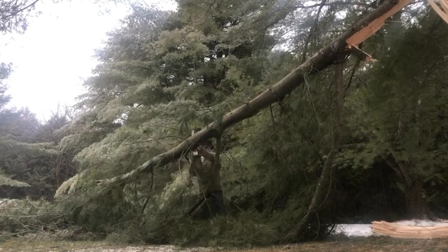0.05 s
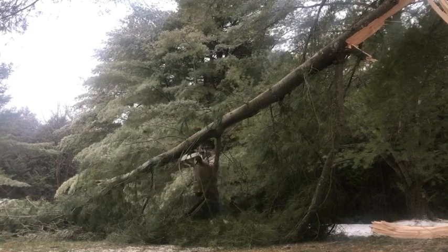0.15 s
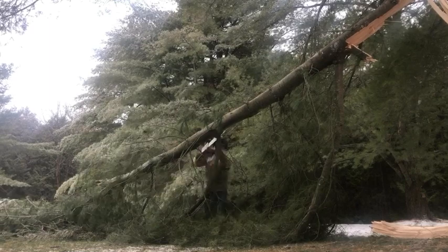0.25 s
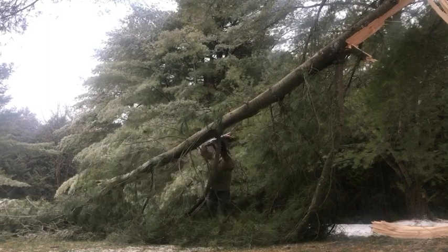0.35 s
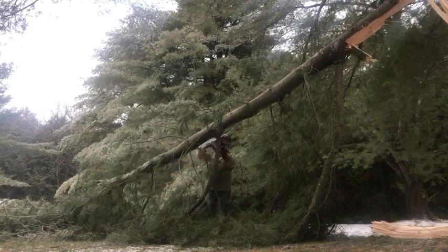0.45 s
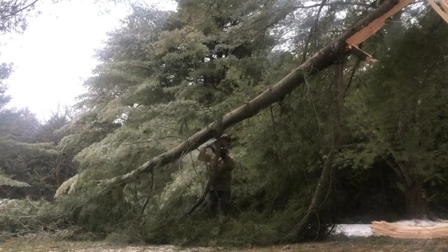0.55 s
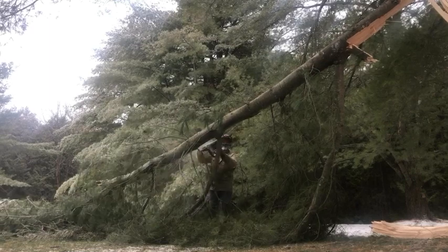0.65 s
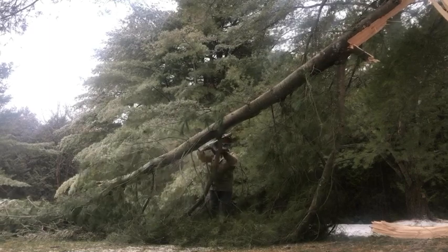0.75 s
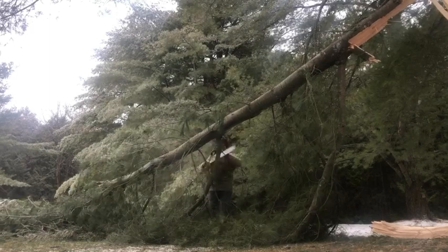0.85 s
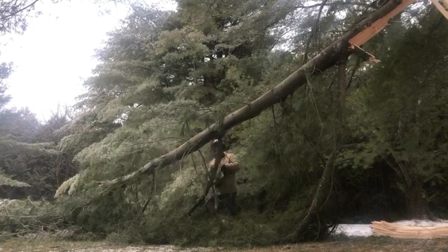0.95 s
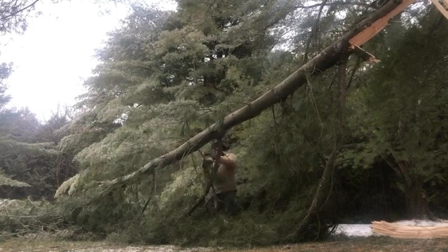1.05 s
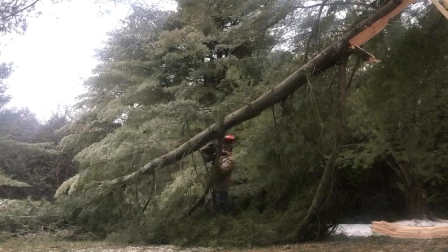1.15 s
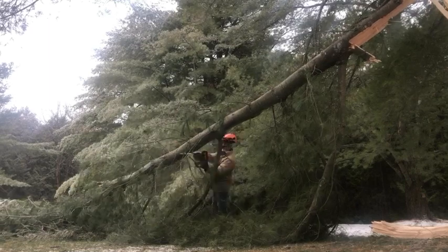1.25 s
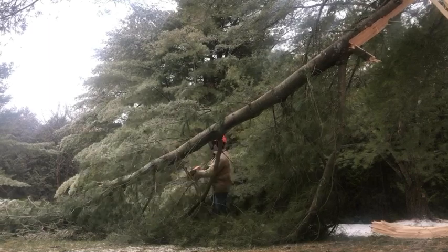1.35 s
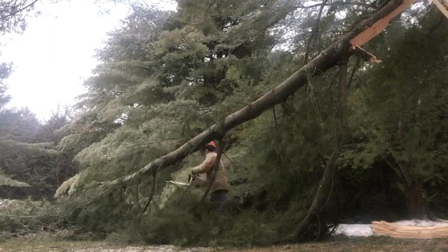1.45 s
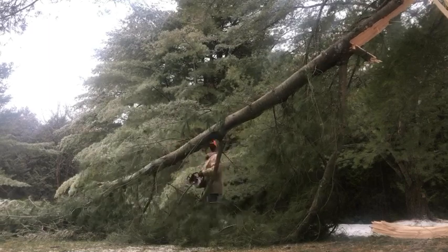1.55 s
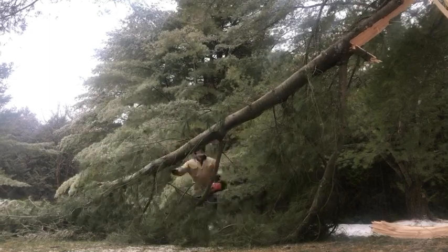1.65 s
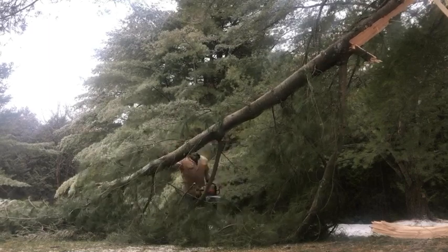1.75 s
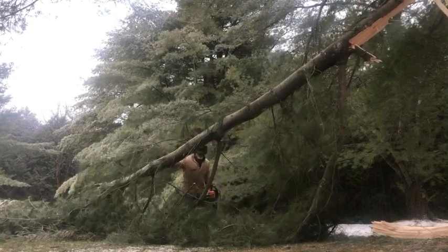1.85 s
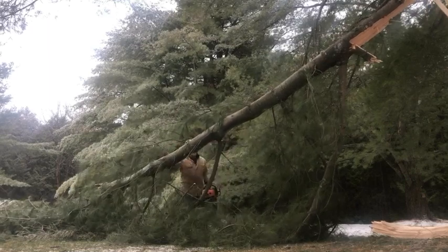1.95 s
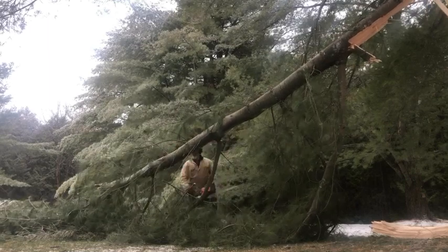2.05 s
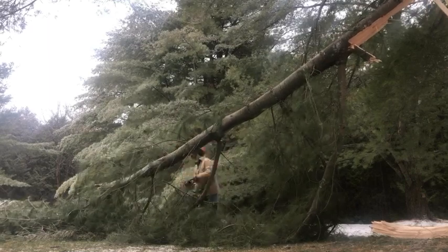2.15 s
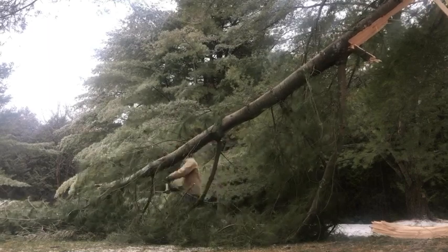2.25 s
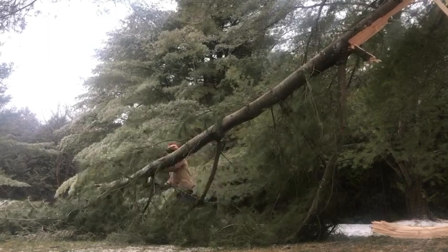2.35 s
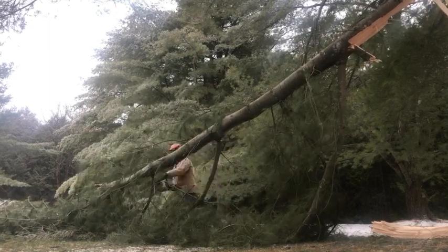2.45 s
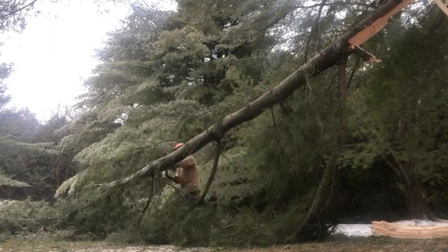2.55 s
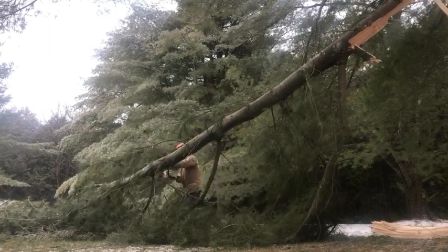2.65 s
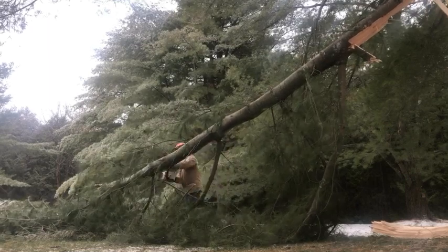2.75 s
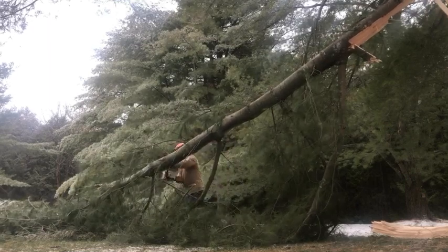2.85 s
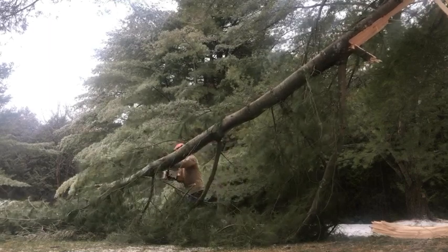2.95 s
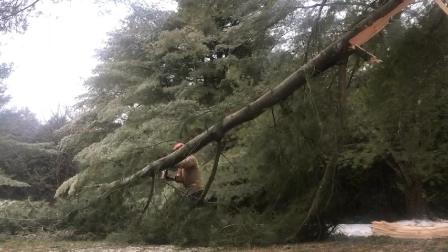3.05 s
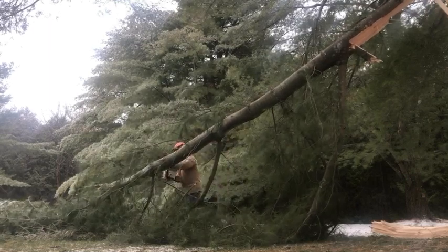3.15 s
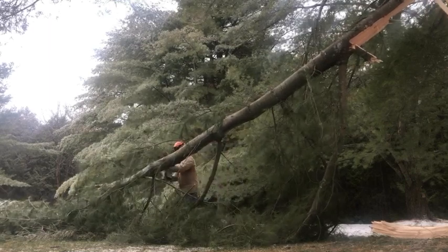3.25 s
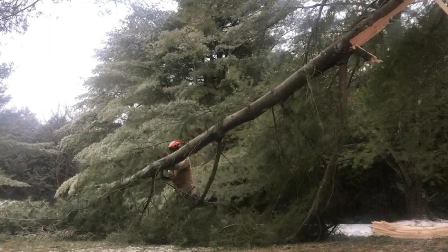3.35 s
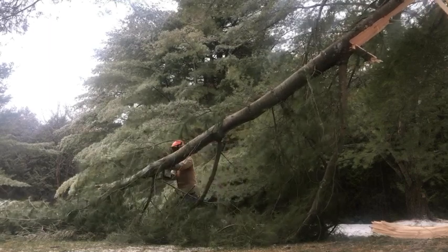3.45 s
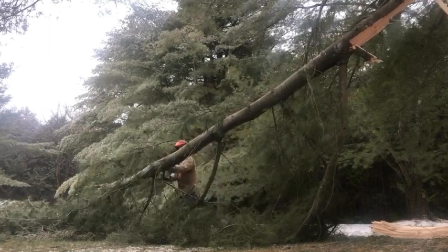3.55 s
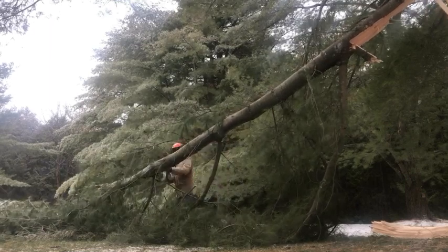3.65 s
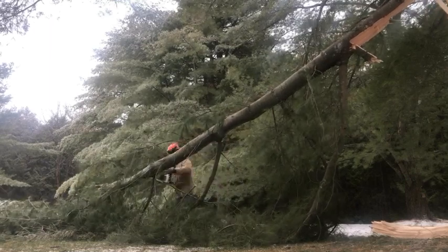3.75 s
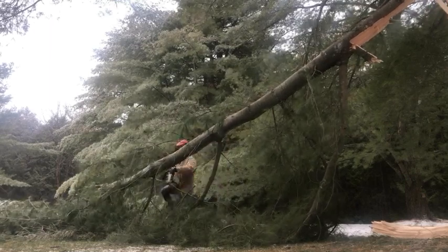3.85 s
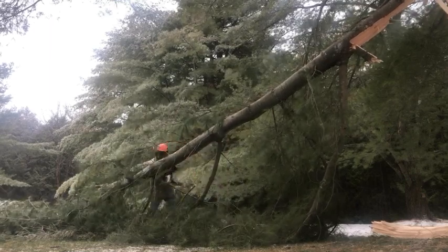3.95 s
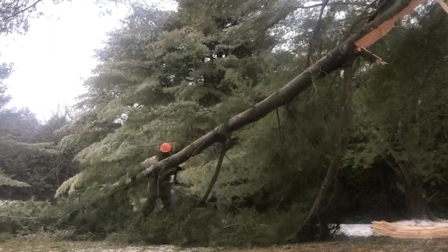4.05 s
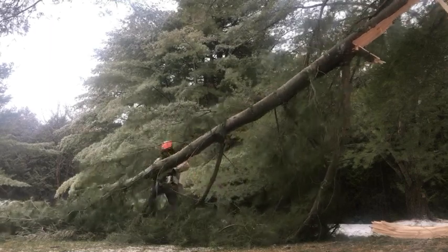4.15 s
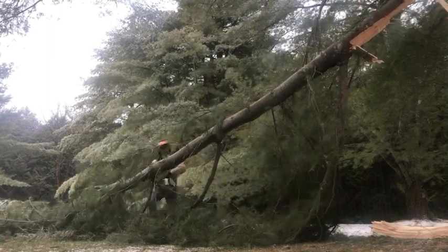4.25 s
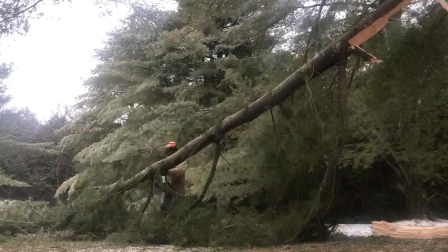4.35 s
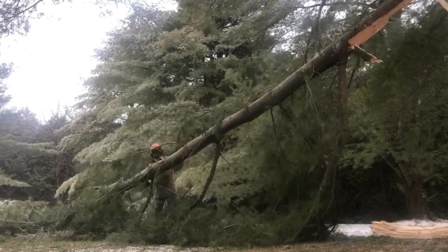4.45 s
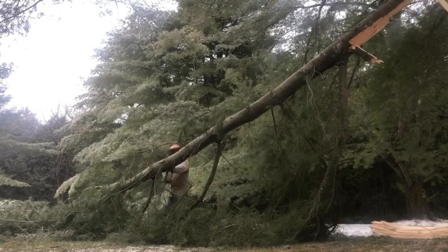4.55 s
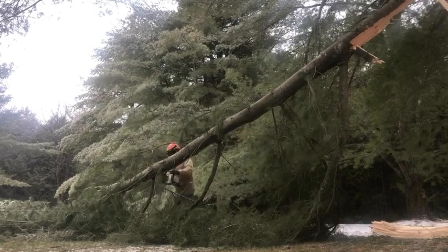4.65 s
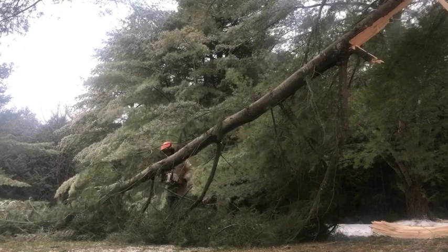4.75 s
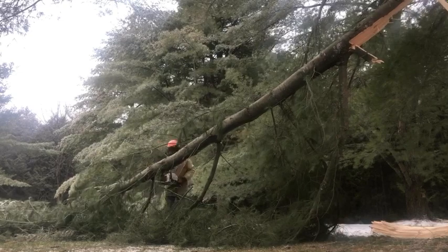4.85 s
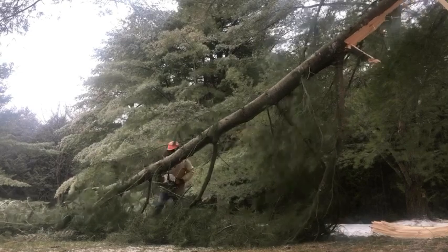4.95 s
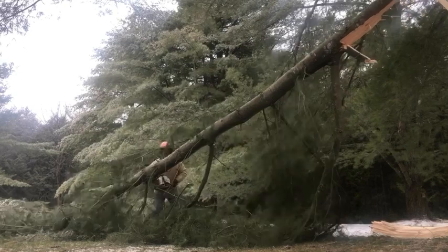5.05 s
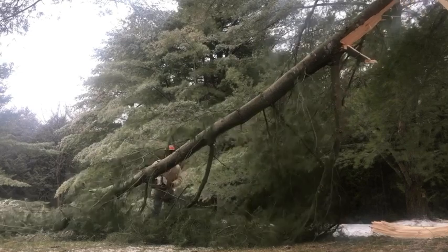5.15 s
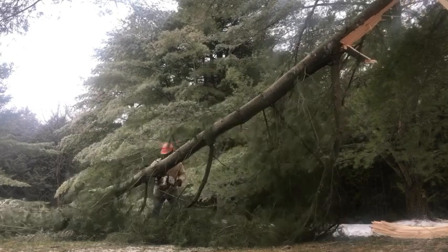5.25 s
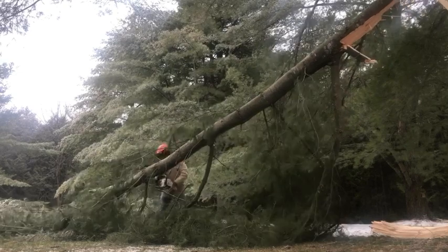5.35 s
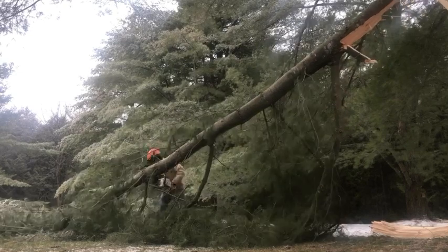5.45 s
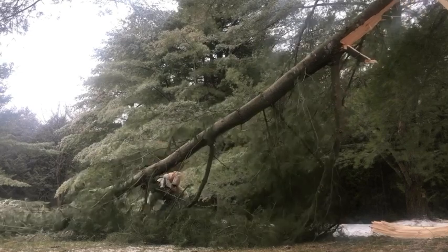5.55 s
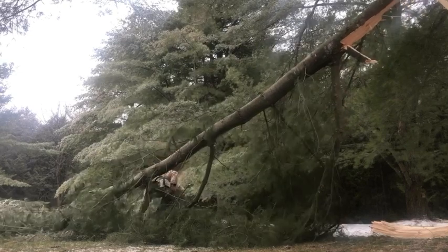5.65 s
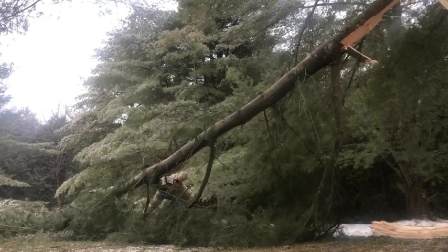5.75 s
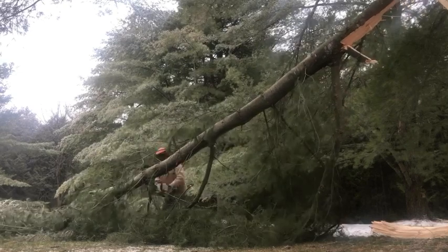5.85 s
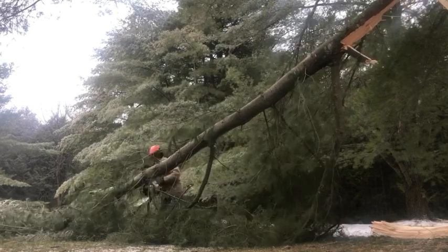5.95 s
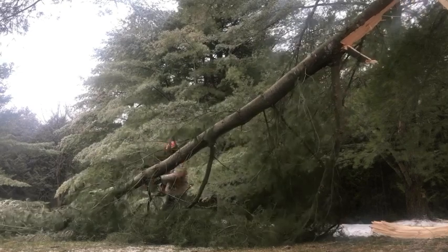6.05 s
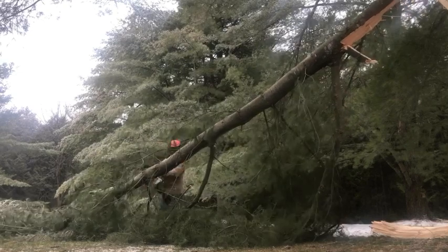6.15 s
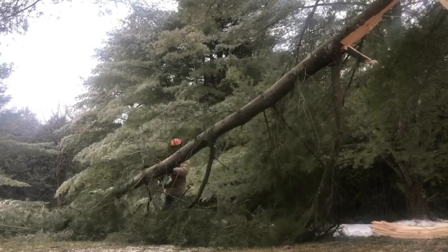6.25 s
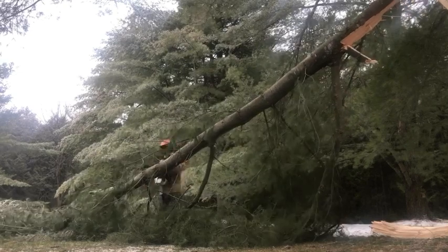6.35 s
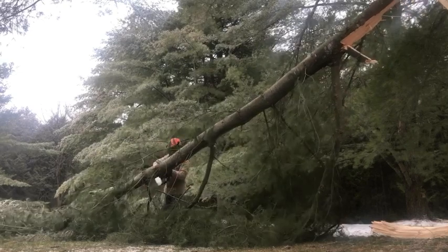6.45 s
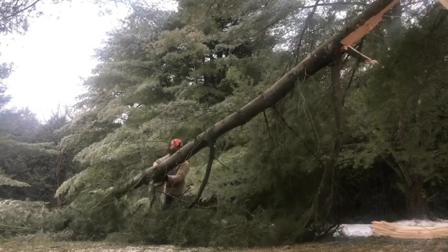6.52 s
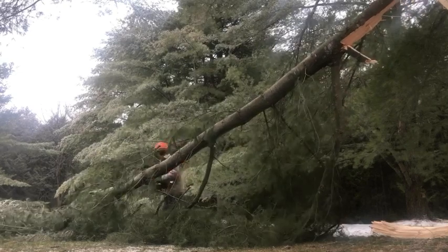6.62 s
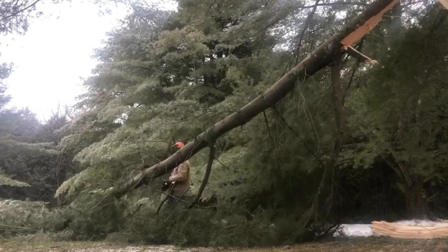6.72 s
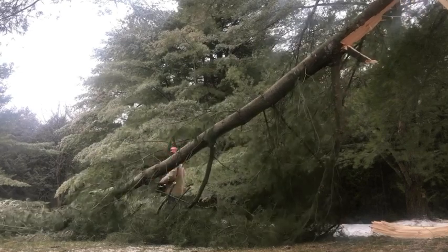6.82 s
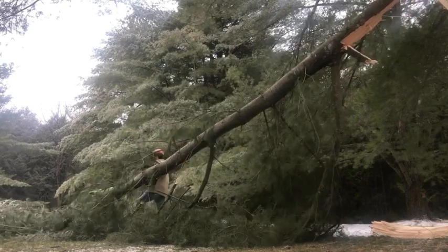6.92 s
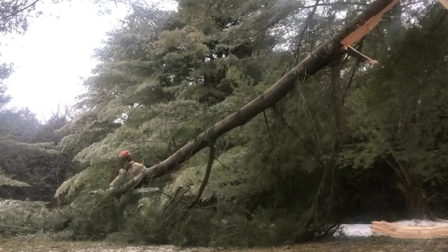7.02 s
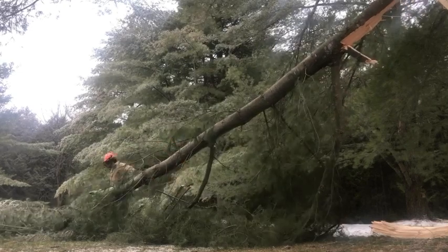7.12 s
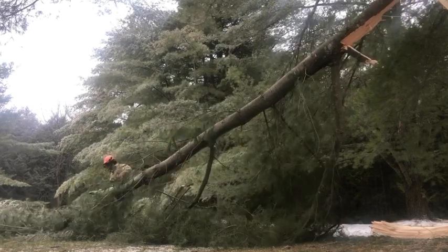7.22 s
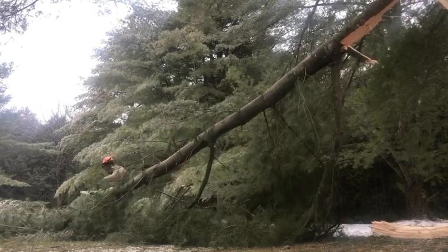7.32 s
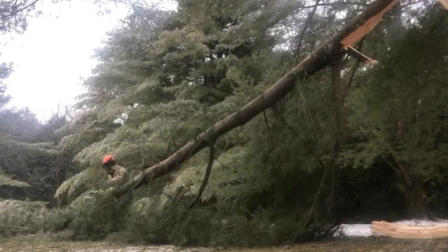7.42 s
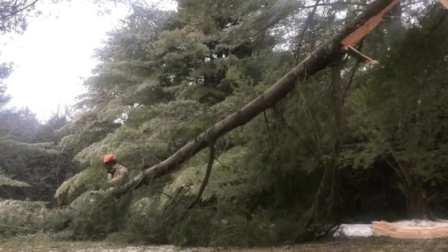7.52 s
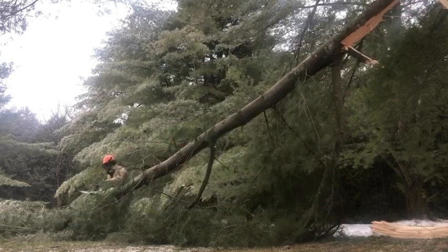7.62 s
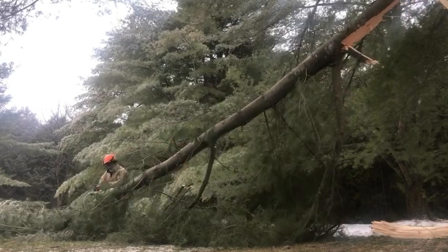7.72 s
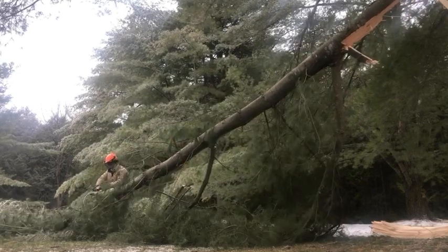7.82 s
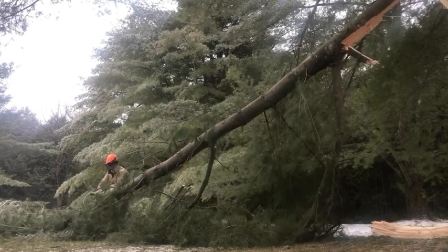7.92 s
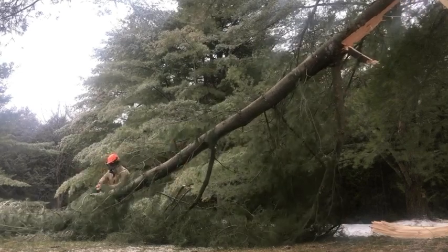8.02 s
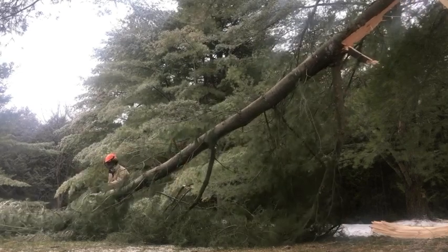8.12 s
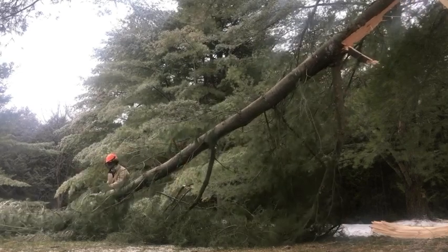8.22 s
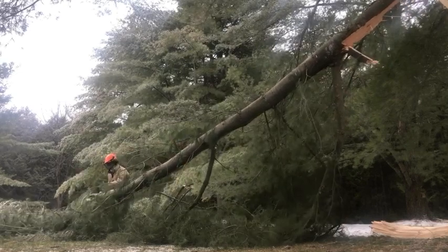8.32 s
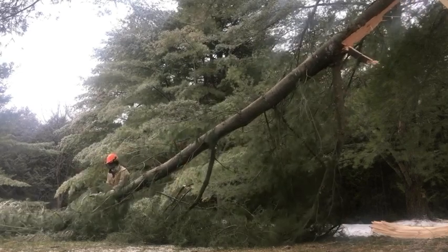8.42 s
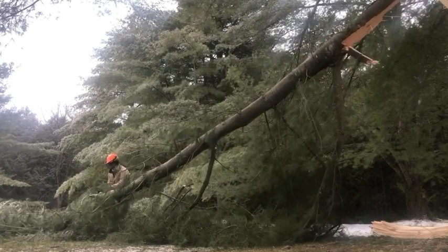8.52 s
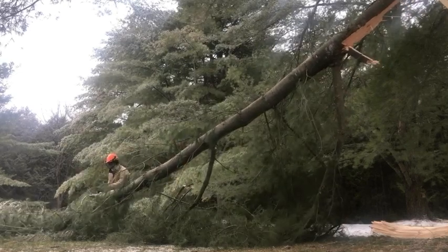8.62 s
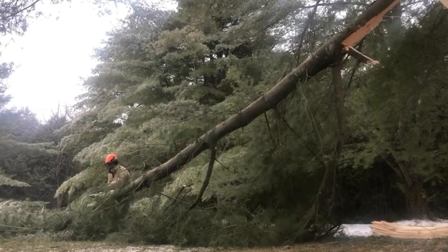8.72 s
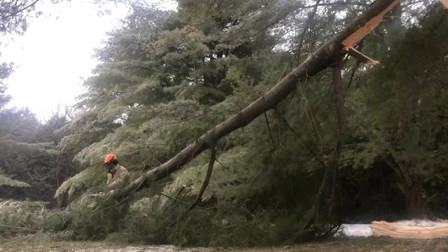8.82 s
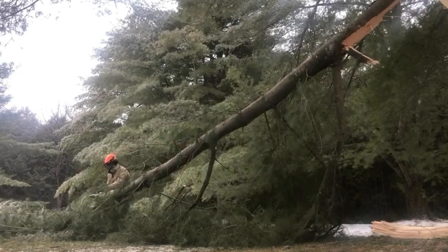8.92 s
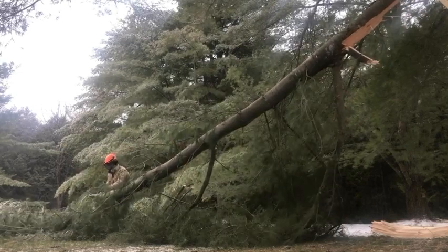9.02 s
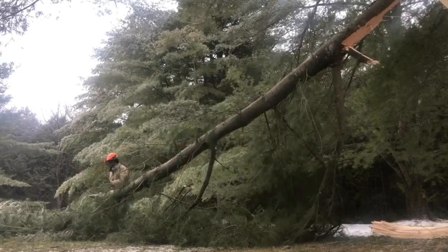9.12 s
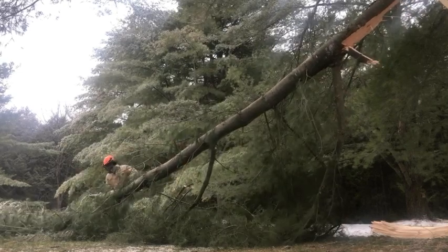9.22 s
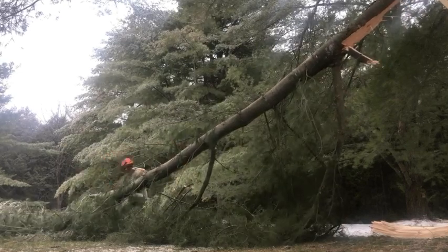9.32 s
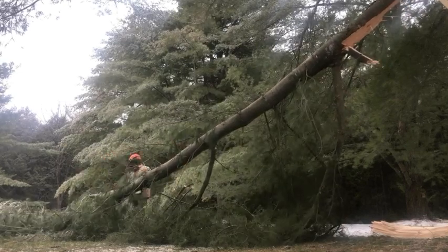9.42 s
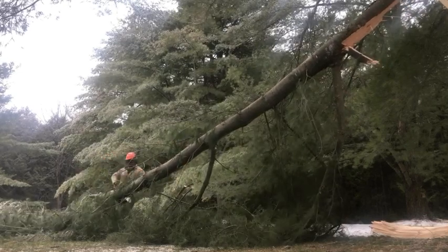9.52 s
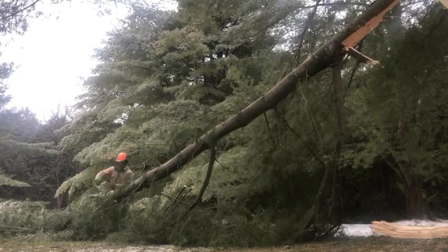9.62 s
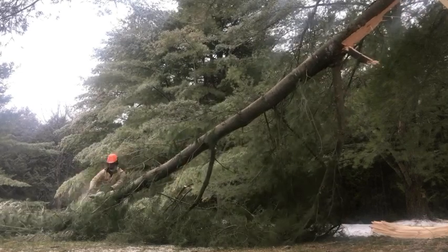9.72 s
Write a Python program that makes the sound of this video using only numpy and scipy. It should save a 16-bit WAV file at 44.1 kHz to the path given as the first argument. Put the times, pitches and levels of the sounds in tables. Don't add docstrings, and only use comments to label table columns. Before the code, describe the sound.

Bursts of bright, buzzing chainsaw exhaust and hissing chain alternate with a much quieter, uneven idle that rattles and faintly hums. Two groups of cuts come early, a brief flurry of revs after a long idle, and more cuts near the end. The saw is heard from a fixed, moderately distant microphone among trees, with short scattered reflections and a barely audible low outdoor murmur.

```python
import sys
import numpy as np
from scipy import signal
from scipy.fft import rfft, irfft
from scipy.io import wavfile
from scipy.ndimage import uniform_filter1d

SR = 44100
rng = np.random.default_rng(int(sys.argv[2]) if len(sys.argv) > 2 else 0)


def voltage_ratio(decibels):
    exponent = np.asarray(decibels, float) / 20
    return 10 ** exponent


def wrap_up_sound(samples):
    columns = np.atleast_2d(samples).T
    tamed = np.clip(columns, -1, 1)
    steps = np.round(tamed * 32767).astype(np.int16)
    wavfile.write(sys.argv[1], SR, steps)


N = 431298
IDLE_HZ, CLUTCH_HZ, FULL_HZ = 50, 105, 190
HUM_ORDER = 5

# f/Hz, level/dB
PORT = [(350, -31), (520, 4), (660, 4.5), (880, 5), (1050, -15), (1320, -11.5), (1700, -18), (2200, -21.5),
        (3400, -44), (4500, -15), (7000, -17.5)]
# f/Hz, level/dB
IDLE_COLOUR = [(590, -51), (1000, -12), (1800, -20), (1970, -12), (2290, -13), (2720, -8), (2950, -4.5),
               (3800, -2.5), (5750, -17), (8800, -14), (10200, -20.5), (11200, -17.5), (15600, -25.5)]
MOVES_S = [
    1.9,
    7.1,
]


def level(x):
    return x / np.sqrt(np.mean(x ** 2))


def curves(rows):
    s, *columns = np.transpose(rows)
    return [np.interp(np.arange(N) / SR, s, c) for c in columns]


def band_filter(x, order, edge_hz, kind):
    return signal.sosfilt(signal.butter(order, edge_hz, kind, fs=SR, output="sos"), x)


def resonance(x, hz, width_hz):
    return signal.lfilter(*signal.iirpeak(hz, hz / width_hz, SR), x)


def colour(x, points):
    size = 4096
    hz, db = np.transpose(points)
    grid_hz = np.arange(size // 2 + 1) * SR / size
    gain_db = np.interp(np.log(grid_hz + 1), np.log(hz), db)
    cep = irfft(gain_db * np.log(10) / 20)
    cep[1:size // 2] *= 2
    cep[size // 2 + 1:] = 0
    return signal.fftconvolve(x, irfft(np.exp(rfft(cep))))[:N]


def steady(x, seconds):
    return x / np.sqrt(uniform_filter1d(x ** 2, int(seconds * SR)) + 1e-12)


def walk(rate_hz):
    k = int(SR / rate_hz)
    held = np.repeat(rng.standard_normal(N // k + 1), k)
    return 1.3 * uniform_filter1d(uniform_filter1d(held, k), k)[:N]


def lag(goal, held, start, in_s, out_s):
    out, edges = np.empty(N), np.r_[0, np.flatnonzero(np.diff(held)) + 1, N]
    for a, b in zip(edges, edges[1:]):
        keep = np.exp(-1 / (SR * (in_s if held[a] else out_s)))
        out[a:b] = signal.lfilter([1 - keep], [1, -keep], goal[a:b], zi=[keep * start])[0]
        start = out[b - 1]
    return out


def trigger(idle_hz):
    # t/s, length/s, firing rate reached/Hz, exhaust level/dB, chain level/dB
    high_limbs = [(0.0, .045, 176.6, -1, 0), (.045, 0.086, 206.1, 0, 0.5), (.19, 0.027, 130.6, -2.5, 0.5),
                  (.265, .035, 157.9, 0.5, 1), (.347, .073, 207.6, 0.5, 1.5), (.42, .034, 188.1, 1, 0.5),
                  (.454, .095, 219.7, 2, 0.5), (.549, .095, 215.9, 1, 0.5), (.644, 0.066, 229.3, 1, 0.5),
                  (.708, .14, 216.6, 0.5, 0.5), (1.122, 0.034, 115, -1, 1.5), (1.185, .055, 209.3, -3, 4.5),
                  (1.24, 0.061, 202, -4.5, 1), (1.302, 0.046, 230.6, -2, -0.5)]
    low_limbs = [(2.298, .03, 123.5, 0.5, -1.5), (2.352, .04, 188, 1, 2), (2.392, .028, 215.5, -0.5, 0),
                 (2.508, .038, 152.1, -1.5, 2), (2.575, .06, 209.2, -0.5, 3), (2.635, .044, 184, -0.5, 0.5),
                 (2.679, .045, 221, -0.5, 1), (2.757, .025, 183.4, -1.5, 0.5), (2.782, .03, 172, -0.5, 2),
                 (2.812, .05, 220.6, -0.5, 1), (2.862, .2, 218.2, 0.5, 0), (3.062, .05, 226.7, -0.5, 0.5),
                 (3.112, .06, 224.6, -3, -0.5), (3.172, .03, 189, -6, 0), (3.202, .05, 221, -1, -0.5),
                 (3.252, .036, 205, -3, 0.5), (3.288, .03, 162.2, -1, 0.5), (3.318, .05, 164.8, 0.5, 0.5),
                 (3.368, .06, 92, -14, -12), (3.47, .055, 105, -0.5, 1.5), (3.525, .04, 70.02, -12, -7)]
    blips = [
        (6.242, .028, 104.7, 0.11, 0.12),
        (6.327, .035, 153.2, 2.08, 0.031),
        (6.412, .03, 166.2, 0.099, -0.73),
        (6.465, .05, 225.4, -0.034, -0.089),
        (6.516, .035, 214.6, -2.3, -0.25),
        (6.55, .035, 233, -1.1, 0),
    ]
    crown_limbs = [(7.445, .155, 213, -1, -3), (7.6, .04, 173.7, -1, -5.5), (7.64, .025, 185.3, -3, -3.5),
                   (7.72, .06, 193, -3.5, -3.5), (7.91, .05, 192.8, -2, -0.5),
                   (7.96, .072, 219.6, -2.5, -3.5), (8.14, .09, 221, -0.5, -2),
                   (8.23, .075, 214.3, -1.5, -3.5), (8.365, .06, 206.3, -3, -3.5),
                   (8.425, .135, 212, -3, -4), (8.645, .215, 216.4, -1, -2), (8.86, .025, 199.9, 0, -3),
                   (8.885, .02, 211, -4, -3), (8.905, .03, 196, -1, -3), (8.935, .09, 220.3, 0, -2.5),
                   (9.025, .04, 198.4, -3, -3), (9.488, .025, 108.4, -0.5, -3),
                   (9.57, .035, 145.6, -1.5, -0.5), (9.63, .045, 204.6, -1, -1),
                   (9.675, .04, 206.9, -1.5, -3.5), (9.715, .07, 190, -0.5, -4.5)]
    start_hz, catch_hz, pickup_hz_per_s = 99.6, 92, 2300
    coast_s, touch_s = .075, .015
    open_s, shut_s = 0.004, 0.0061

    squeezes = high_limbs + low_limbs + blips + crown_limbs
    at, length, top_hz, exhaust_db, chain_db = np.transpose(squeezes)
    t = np.arange(N) / SR
    following = np.r_[at[1:], t[-1] + 1]
    joined = following - at - length < touch_s
    hz, held, now_hz = np.full(N, 1. * start_hz), np.zeros(N, int), start_hz
    for k, end in enumerate(np.where(joined, following, at + length)):
        on, off = (t >= at[k]) & (t < end), (t >= end) & (t < following[k])
        if k and joined[k - 1]:
            climb_s = end - at[k]
        else:
            now_hz = max(now_hz, catch_hz)
            climb_s = abs(top_hz[k] - now_hz) / pickup_hz_per_s
        hz[on] = np.interp(t[on], [at[k], at[k] + climb_s], [now_hz, top_hz[k]])
        held[on] = 1
        hz[off] = idle_hz[off] + (hz[on][-1] - idle_hz[off]) * np.exp(-(t[off] - end) / coast_s)
        now_hz = hz[on | off][-1]
    latest = np.maximum(np.searchsorted(at, t, "right") - 1, 0)
    soften = lambda x: uniform_filter1d(x, int(.012 * SR))
    throttle = lag(1. * held, held, 0.57, open_s, shut_s)
    return soften(hz), throttle, soften(exhaust_db[latest]), soften(chain_db[latest])


def loudness(law, hz, throttle, effort_db, swing_db):
    top_hz, fade_hz = 215, 21.9
    in_db, in_slope, out_db, out_slope, idle_db, share = law
    octaves = np.log2(hz / top_hz)
    trigger_in = throttle * voltage_ratio(in_db + in_slope * octaves)
    trigger_out = (1 - throttle) * voltage_ratio(out_db + out_slope * octaves)
    revving = (trigger_in + trigger_out) * voltage_ratio(effort_db)
    above_idle = np.clip((hz - IDLE_HZ) / fade_hz, 0, 1)
    return 10 * np.log10(revving ** 2 * above_idle + voltage_ratio(idle_db + share * swing_db) ** 2)


def firings(hz, load, wound):
    wobble = 1 + (.025 - .015 * load - .005 * wound) * walk(28)
    turns = np.cumsum(hz * wobble) / SR
    cycle = turns.astype(int)
    size = voltage_ratio((3.2 - 1.4 * load - 1.3 * wound) * rng.standard_normal(N // 100)[cycle])
    at = np.flatnonzero(np.diff(cycle)) + 1
    late = (turns[at] - cycle[at]) / (turns[at] - turns[at - 1])
    pulses = np.zeros(N)
    pulses[at - 1] += size[at] * late
    pulses[at] += size[at] * (1 - late)
    return pulses, turns, size


def exhaust(pulses, load, wound, thump_db, bark_db):
    # f/Hz, level/dB
    can = [(40, -41), (95, 0.5), (215, 2.5), (430, -1.5), (560, 1.5), (900, -90)]
    gas = rng.standard_normal((3, N))
    thump = (.45 + .55 * load) * steady(colour(pulses, can), .04)
    thump = thump + voltage_ratio(-2 - 17 * load - 7 * wound) * level(colour(gas[0], can))
    bark = (0.38 + 0.3 * load + 0.49 * wound) * steady(colour(pulses, PORT), 0.028)
    bark = bark + voltage_ratio(1.0 - 0.8 * load - 12.3 * wound) * level(colour(gas[1], PORT))
    shake = level(band_filter(gas[2], 2, [45, 130], "band"))
    bark = bark + voltage_ratio(-8 - 30 * wound) * load * shake
    return voltage_ratio(thump_db) * thump, voltage_ratio(bark_db) * bark


def chain(hz, pulses, turns, size, load, wound, rattle_db, hiss_db):
    # f/Hz, level/dB
    overhead = [(590, -38.5), (1000, -7.5), (1200, -13), (1660, -7.5), (2110, 0.5), (2340, 0), (3200, -1),
                (3800, -10.5), (4460, -3), (4950, -2.5), (6160, -9.5), (8210, -8), (15600, -7)]
    chest = [(590, -39), (1000, -7.5), (1190, -16.5), (1320, -13.5), (1660, -24), (1860, -26), (1930, -14),
             (3420, -3), (5300, -15), (6520, -10.5), (9430, -11), (11300, -10), (15600, -11.5)]
    far_end = [(590, -43), (1000, -0.5), (1320, -10.5), (1840, -15), (2090, -3.5), (2290, -5.5), (3390, 1),
               (3670, -1.5), (4360, -2), (8120, -10.5), (15600, -5.5)]
    split_hz = 6500

    lumpy = np.clip(1.1 - (hz - 39) / 8, .45, 1.2) * (1 - load) + load
    phase = np.pi * turns + .5 * (1 - load) * walk(30)
    puff = .75 + .95 * load + lumpy * voltage_ratio(2.0 * walk(3)) * size * np.sin(phase) ** 4
    noise = steady(rng.standard_normal(N) * puff * voltage_ratio(1.8 * walk(30)), 0.045)
    knock = band_filter(pulses, 2, 4300, "low")
    noise = noise + .33 * wound * steady(knock, .04)
    fins = resonance(knock, 3480, 330)
    noise = noise + voltage_ratio(-16) * wound * steady(fins, 0.0107)

    edges_hz = np.geomspace(1200, 16000, 10)
    noise = noise + sum(.2 * walk(4) * band_filter(noise, 1, pair, "band")
                        for pair in zip(edges_hz, edges_hz[1:]))

    place = np.searchsorted(MOVES_S, np.arange(N) / SR)
    in_place = np.choose(place, [colour(noise, points) for points in (overhead, chest, far_end)])
    rung = covers(colour(noise, IDLE_COLOUR))
    work_share, idle_share = np.sqrt(load), np.sqrt(1 - load)
    out = 0
    for kind, db in (("low", rattle_db), ("high", hiss_db)):
        working = steady(band_filter(in_place, 4, split_hz, kind), 0.13)
        idling = steady(band_filter(rung, 4, split_hz, kind), 0.2696)
        out = out + voltage_ratio(db) * (work_share * working + idle_share * idling) / (work_share + idle_share)
    return out


def covers(x):
    # f/Hz, width/Hz, level/dB
    casing = [(2720, 78, -9), (3750, 210, -10), (4360, 300, -4.5)]
    return x + sum(voltage_ratio(db + 3 + 3.6 * walk(3.12)) * resonance(x, hz, width_hz)
                   for hz, width_hz, db in casing)


def whine(turns, wound, throttle):
    # multiple, level overhead/dB, at the chest/dB, at the far end/dB
    orders = [(4, -40, -33, -38), (6, -44, -33, -39), (7, -50, -43, -48), (9, -39, -39, -43),
              (10, -35, -46, -37), (14, -40, -39, -44), (16, -42, -33, -36)]
    place = np.searchsorted(MOVES_S, np.arange(N) / SR)
    lines = 0
    for k, *db in orders:
        strength = voltage_ratio(np.array(db)[place] + 2.5 * walk(7))
        lines = lines + strength * np.sin(2 * np.pi * round(k) * turns)
    return wound ** 2 * throttle * lines


def chugs():
    # t/s, peak level/dB
    hard_firings = [(2.0827, -30), (2.134, -22), (2.2035, -22), (3.671, -21.5), (3.8814, -29),
                    (3.9524, -28), (4.6764, -21.5), (4.8803, -29), (4.9721, -31), (5.0416, -27),
                    (5.1163, -20), (5.2599, -32), (5.3724, -24), (5.8002, -20.5), (5.892, -26),
                    (5.9594, -21), (6.9889, -24.5)]
    swell = np.zeros(N)
    s = np.arange(SR // 30) / SR
    for at, db in hard_firings:
        shape = np.e * s / 0.0027 * np.exp(-s / 0.0043)
        swell[int((at - .002) * SR):][:len(s)] += voltage_ratio(db - 13.5) * shape
    crack = rng.standard_normal(N)
    return swell * (level(colour(crack, IDLE_COLOUR)) + 0.31 * level(colour(crack, PORT)))


def drone(turns, hum_db, idling):
    return voltage_ratio(hum_db + 1.5 + 2.0 * walk(15)) * idling * np.sin(2 * np.pi * HUM_ORDER * turns)


def trees(x, t60_s, wet_db):
    s = np.arange(SR // 2) / SR
    tail = rng.standard_normal(len(s)) * voltage_ratio(-60 * s / t60_s) * (s > .012)
    tail = signal.lfilter([1], [1, -.4], tail)
    return voltage_ratio(wet_db) * signal.fftconvolve(x, tail / np.sqrt(np.sum(tail ** 2)))[:N]


def murmur():
    # f/Hz, level/dB
    woods = [(15, -53), (25, -15), (92, -19.5), (232, -7), (615, -14), (1500, -24.5), (1950, -30),
             (3300, -120)]
    return voltage_ratio(-40.5 + 0.54 * walk(5.4)) * level(colour(rng.standard_normal(N), woods))


def scene():
    # t/s, hum f/Hz, hum level/dB, level swing/dB
    idling = [(1.05, 220.1, -55, 1.5), (1.58, 225.3, -44, 3), (1.7, 244.8, -46, -2.5),
              (2.2, 230, -49.5, -0.5), (3.64, 190, -59, -2), (3.76, 179.9, -42.5, 0.5),
              (4.35, 241.9, -40.5, 3), (4.54, 201.1, -52, 0.5), (5.13, 199.9, -41, 1),
              (5.64, 219.5, -48, 3), (5.67, 169.6, -46, 0), (6.08, 199.7, -44, 1.5), (6.18, 197.1, -43, 0),
              (6.95, 214.7, -43, 2), (7.03, 201.2, -43, -2.5), (7.38, 207.2, -48, 0),
              (9.27, 196.8, -48, -1.5), (9.48, 214.9, -40, 0)]
    # trigger in level/dB, slope/(dB/octave), trigger out level/dB, slope/(dB/octave),
    # idle level/dB, share of idle swing
    thump_law = (-18, 11, -28.5, 5, -47, 2)
    bark_law = (-25, 1.5, -28.5, 7.5, -57, 1.7)
    rattle_law = (-19, 5, -19, 8.5, -39, 1.44)
    hiss_law = (-20, 8.5, -22, 9.5, -46.5, 2)

    hum_hz, hum_db, swing_db = curves(idling)
    hz, throttle, exhaust_db, chain_db = trigger(hum_hz / HUM_ORDER)
    load = np.clip((hz - IDLE_HZ) / (CLUTCH_HZ - IDLE_HZ), 0, 1)
    wound = np.clip((hz - CLUTCH_HZ) / (FULL_HZ - CLUTCH_HZ), 0, 1)

    held = (throttle > .5).astype(int)
    chain_hz, grip = (lag(x, held, x[0], in_s=.022, out_s=.008) for x in (hz, throttle))
    thump_db = loudness(thump_law, hz, throttle, exhaust_db, swing_db)
    bark_db = loudness(bark_law, hz, throttle, exhaust_db, swing_db)
    rattle_db = loudness(rattle_law, chain_hz, grip, chain_db, swing_db)
    hiss_db = loudness(hiss_law, chain_hz, grip, chain_db, swing_db)

    pulses, turns, size = firings(hz, load, wound)
    thump, bark = exhaust(pulses, load, wound, thump_db, bark_db)
    bright = bark + chain(hz, pulses, turns, size, load, wound, rattle_db, hiss_db)
    bright = bright + chugs() + whine(turns, wound, throttle)
    hum = drone(turns, hum_db, np.clip(1 - 3.2 * load, 0, 1))
    echo = trees(bright, t60_s=.2, wet_db=-16)
    return np.tile(thump + hum + bright + echo + murmur(), (2, 1))


def roll_off(x):
    return signal.sosfilt(signal.butter(12, 15790, fs=SR, output="sos"), x)


def record(dry):
    heard = band_filter(dry, 3, 52, "high")
    heard = np.tanh(.4 * heard) / .4
    return roll_off(heard)


dry = scene()
out = record(dry)
wrap_up_sound(out)
```